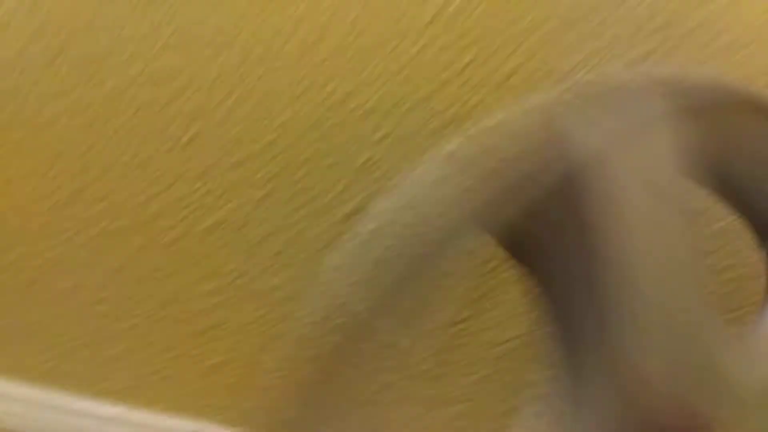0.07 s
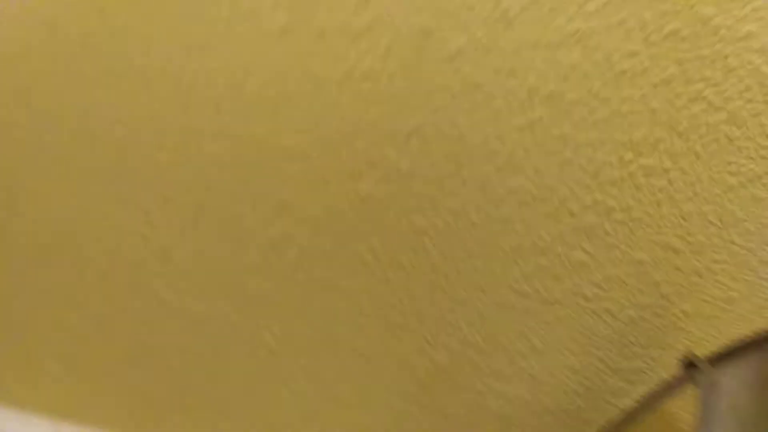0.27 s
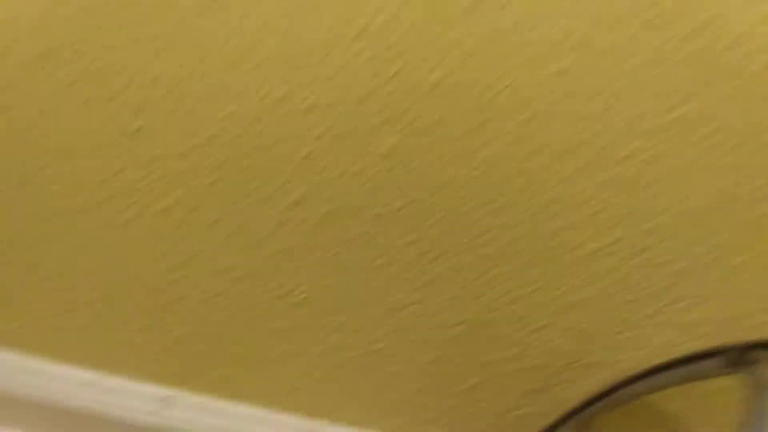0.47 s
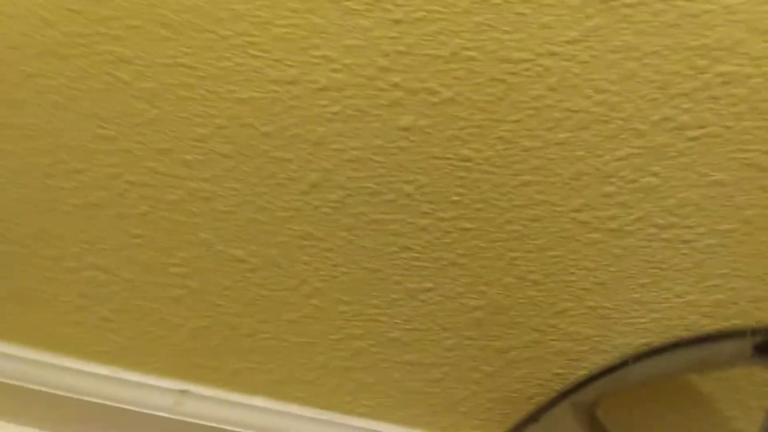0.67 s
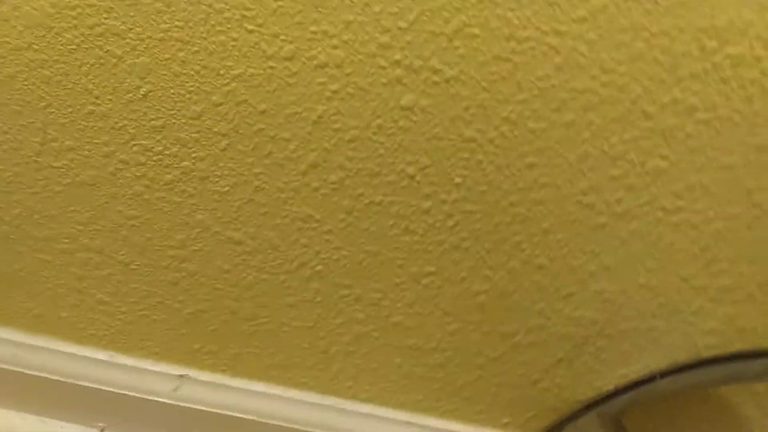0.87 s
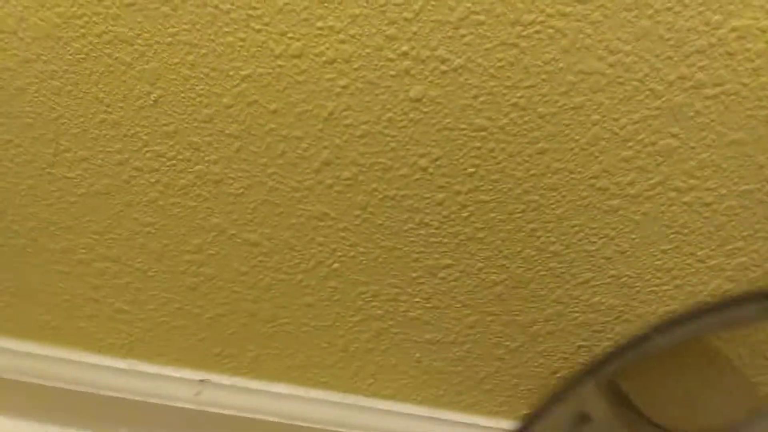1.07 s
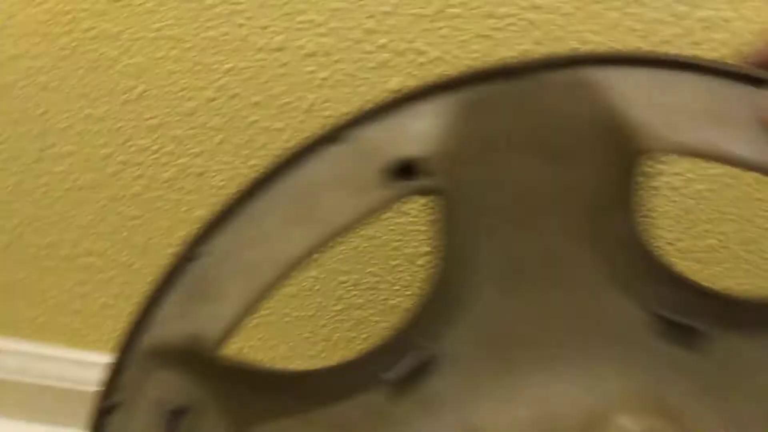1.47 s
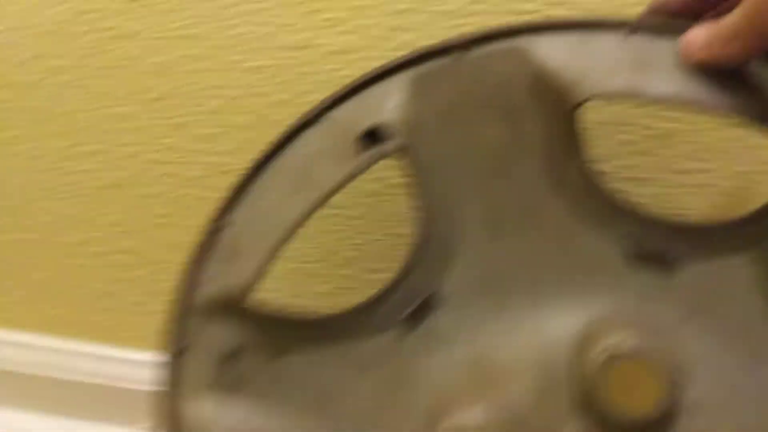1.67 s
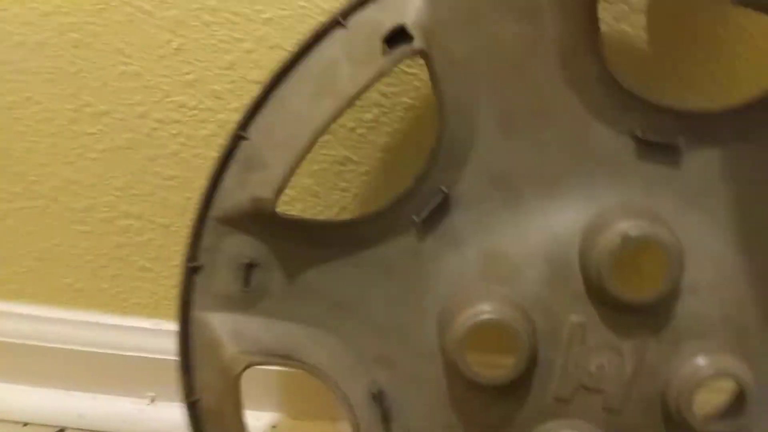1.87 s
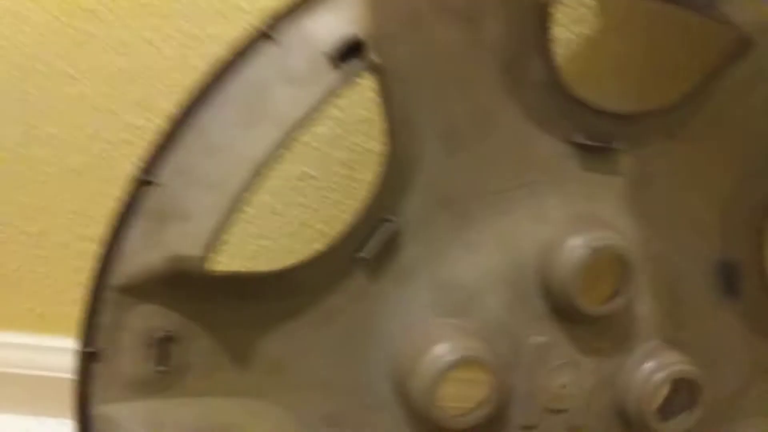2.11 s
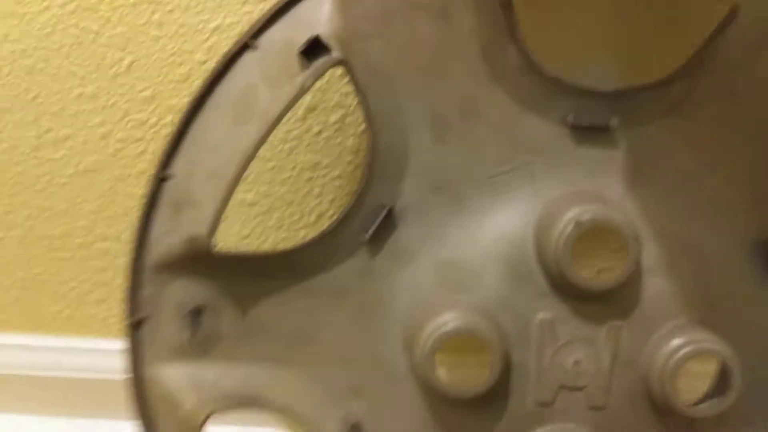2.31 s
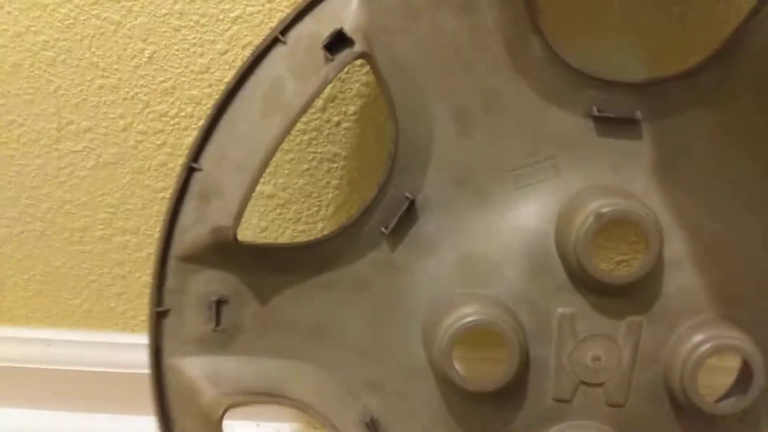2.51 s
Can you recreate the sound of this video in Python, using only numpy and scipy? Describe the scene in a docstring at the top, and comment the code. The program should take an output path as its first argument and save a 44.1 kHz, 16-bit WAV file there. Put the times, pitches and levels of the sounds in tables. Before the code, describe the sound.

Hands turn a plastic hubcap over, close by in a quiet room. A light knock and a loud one briefly ring the thin shell, followed by soft rubbing, dull bumps, a longer scrape and clusters of bright clicks.

```python
"""Light rubbing and two knocks on a plastic hubcap, handled close by in a small, quiet room.
It bumps dully as it is shifted, then scrapes, catches and clicks as it is turned over in the hands.
Knocks and clicks ring the thin shell, and soft bumps make it flex. Rubbing and scraping are many
tiny slips, while a sliding palm gives a smooth hush. The room adds a short tail of echo."""
import sys
import numpy as np
from scipy import signal
from scipy.fft import rfft, irfft, next_fast_len
from scipy.io import wavfile
from scipy.ndimage import uniform_filter1d

SR = 44100
rng = np.random.default_rng(int(sys.argv[2]) if len(sys.argv) > 2 else 0)


def wav_record(signal):
    """Record a signal, one row per channel, as 16-bit PCM in the file named by sys.argv[1]."""
    frames = np.transpose(np.atleast_2d(signal))
    bounded = np.clip(frames, -1, 1)
    # unit amplitude maps onto the largest positive 16-bit level
    quanta = np.round(bounded * 32767).astype(np.int16)
    wavfile.write(sys.argv[1], SR, quanta)


N = 116865
TIME = np.arange(N) / SR
AGE = TIME[:SR * 3 // 4]   # seconds since a contact

# The shell's own notes: (pitch [Hz], relative level [dB], fade time [s]). A fade is a 60 dB drop.
SHELL_NOTES = [(325.6, -5.5, 0.37), (384.7, -11.5, 0.87), (711, 1, .22), (878, 0.5, 0.41), (950, 13, 0.36),
               (1192, -17, 0.092), (1218, 11, 0.19), (1363, 10, 0.13), (1637, 2, 0.21), (1860, 0.5, 0.32),
               (2243, 15.5, 0.2), (2500, -41, 0.12), (2530, -8, 0.56), (5180, 10, 0.051)]
# How long the shell's blur of crowded notes lasts: (frequency [Hz], fade time [s])
SHELL_FADE = [(150, 0.11), (700, 0.3), (2000, 0.072), (5000, 0.11), (14000, 0.074)]
# How long the room's echo lasts: (frequency [Hz], fade time [s])
ROOM_FADE = [(150, 0.15), (700, 0.28), (2000, 0.21), (5000, 0.22), (14000, 0.17)]


def from_db(db):
    """Turn decibels into a multiplier."""
    return 10 ** (np.asarray(db) / 20)


def unit_power(x):
    """Scale a sound so that its average power is 1."""
    return x / np.sqrt(np.mean(x ** 2) + 1e-20)


def unit_energy(x):
    """Scale a sound so that its total energy is 1."""
    return x / np.sqrt(np.sum(x ** 2) + 1e-20)


def at_hz(points, hz):
    """Read between a table's rows, with frequency spaced in octaves."""
    frequencies, values = np.transpose(points)
    return np.interp(np.log(hz + 1), np.log(frequencies), values)


def colour(x, tone):
    """Make each frequency louder or softer, as the tone table says."""
    n = 2 * next_fast_len(len(x))
    gains = from_db(at_hz(tone, np.linspace(0, SR / 2, n // 2 + 1)))
    cepstrum = irfft(np.log(gains))
    cepstrum[1:n // 2] *= 2   # folded so the filter rings after a hit, never before
    cepstrum[n // 2 + 1:] = 0
    return irfft(rfft(x, n) * np.exp(rfft(cepstrum)))[:len(x)]


def keep_band(x, side, hz, order):
    """Keep the "low" or "high" side of hz; a higher order cuts more steeply."""
    return signal.sosfilt(signal.butter(order, hz, side, fs=SR, output="sos"), x)


def dying_noise(fade_times):
    """Countless overlapping notes blur into noise that dies away band by band."""
    edges = np.append(0, np.geomspace(250, SR / 2, 9))
    white = rfft(rng.standard_normal(len(AGE)))
    hz = np.fft.rfftfreq(len(AGE), 1 / SR)
    out = np.zeros(len(AGE))
    for low, high in zip(edges, edges[1:]):
        band = irfft(white * (hz >= low) * (hz < high), len(AGE))
        out += band * from_db(-60 * AGE / at_hz(fade_times, (low + high) / 2))
    return unit_energy(out)


def ringing(notes):
    """Clear fading notes, varied at random as if the shell were touched in a new spot."""
    out = np.zeros(len(AGE))
    for hz, db, fade_s in notes:
        sign = rng.choice([-1, 1])
        level = from_db(db + 2 * rng.normal() - 60 * AGE / fade_s)
        out += sign * level * np.cos(2 * np.pi * hz * AGE)
    return unit_energy(out)


def burst(fade_s):
    """The brief noise that starts a contact."""
    return unit_energy(rng.standard_normal(len(AGE)) * from_db(-60 * AGE / fade_s))


def strike(contacts, make_hit, order):
    """Play a fresh hit for each contact; each contact's brightness sets how much treble it keeps."""
    out = np.zeros(N + SR)
    for time_s, db, brightness_hz in contacts:
        hit = keep_band(make_hit(), "low", brightness_hz, order)
        opening_level = np.std(hit[:SR // 100])   # over the first 10 ms
        start = int(time_s * SR)
        out[start:start + len(hit)] += from_db(db) * hit / opening_level
    return out[:N]


def friction(slips_per_s, spread_db, hiss_db, ring_db, rough_db):
    """Tiny uneven slips over a hiss, bunched by the changing grip and smeared by the shell."""
    grip_s = .004   # the grip comes and goes this quickly
    sizes = from_db(spread_db * np.minimum(rng.exponential(1, N), 4)) * rng.choice([-1, 1], N)
    slips = unit_power(sizes * (rng.random(N) < slips_per_s / SR))
    slips += from_db(hiss_db) * rng.standard_normal(N)
    grip = np.interp(TIME / grip_s, np.arange(N), rng.standard_normal(N))
    slips *= from_db(rough_db * grip)
    return slips + from_db(ring_db) * signal.fftconvolve(slips, dying_noise(SHELL_FADE))[:N]


def loudness(curve, column):
    """Follow one decibel column of a table through time, silent outside its rows."""
    rows = np.array(curve)
    return from_db(np.interp(TIME, rows[:, 0], rows[:, column], left=-np.inf, right=-np.inf))


def slide(x, strokes, mids_db, treble_db, room_db):
    """The mids and treble of the friction rise and fall with each stroke, and the room echoes."""
    split_hz, ease_s = 3090, 0.0076
    out = np.zeros(N)
    for column, side, gain_db in ((1, "low", mids_db), (2, "high", treble_db)):
        band = unit_power(keep_band(x, side, split_hz, order=3))
        level = from_db(gain_db) * sum(loudness(curve, column) for curve in strokes)
        out += band * uniform_filter1d(level, int(ease_s * SR) + 1)
    return out + from_db(room_db) * signal.fftconvolve(out, dying_noise(ROOM_FADE))[:N]


def room_tone():
    """Quiet air with a faint hum and a thin, high whine."""
    # Tone of the air: (frequency [Hz], gain [dB])
    air_tone = [(30, -37), (60, -40), (140, -31), (300, -20), (500, -10.5), (720, -9.5), (950, -21),
                (1350, -7.5), (1700, -19), (6000, -18.5), (9000, -30), (16000, -36.5)]
    hum_hz, whine_hz = 728, 14002
    air = unit_power(colour(rng.standard_normal(N), air_tone))
    hum = unit_power(np.sin(2 * np.pi * hum_hz * TIME))
    whine = unit_power(np.sin(2 * np.pi * whine_hz * TIME))
    return from_db(-56) * air + from_db(-64) * hum + from_db(-79) * whine


def rubbing():
    """Hands and rim slide lightly over the plastic, faintly ringing the shell."""
    # One curve for each stroke: (time [s], relative mids level [dB], relative treble level [dB])
    strokes = [
        [(0.0, -50, -59), (0.034, -37.5, -48), (0.06, -40, -44), (0.08, -37, -53), (0.098, -42, -47.5),
         (0.16, -38.5, -34), (0.215, -49.5, -53.5)],
        [(0.5, -59, -36), (0.524, -40.5, -41), (0.556, -34, -29.5), (0.578, -35, -41.5), (0.582, -40.5, -36),
         (0.674, -55.5, -62), (0.69, -51, -64)],
        [(0.96, -64, -71), (0.972, -52, -54), (0.994, -58.5, -79), (1.024, -47, -50), (1.086, -48.5, -52),
         (1.13, -36.5, -40.5), (1.2, -52.5, -68)],
        [(1.224, -52, -40), (1.232, -41, -38.5), (1.248, -34, -37), (1.274, -42, -48.5), (1.284, -34, -35),
         (1.382, -49.5, -52), (1.41, -65, -53)],
        [(2.108, -32, -64), (2.126, -25, -23), (2.136, -33, -36), (2.196, -40, -42), (2.2, -42, -39)],
        [(2.292, -43, -49), (2.296, -64, -36.5), (2.344, -25, -39.5), (2.358, -42, -52), (2.374, -38, -59),
         (2.382, -28.5, -35), (2.48, -79, -83)],
        [(0.7, -46, -48), (0.75, -47.5, -53), (0.84, -51.5, -53.5), (0.9, -66, -67)],
    ]
    # Tone of a light rub: (frequency [Hz], gain [dB])
    rub_tone = [(60, -52), (190, -35.5), (420, -11), (700, -3), (1000, -4), (1500, -4.5), (2250, -2),
                (3300, -10), (4400, -7), (5700, -8.5), (8000, -18.5), (12700, -26), (16000, -32)]
    slips = friction(slips_per_s=1500, spread_db=5, hiss_db=-8.5, ring_db=-1, rough_db=0.6)
    ring = unit_power(signal.fftconvolve(slips, ringing(SHELL_NOTES))[:N])
    rub = unit_power(colour(slips, rub_tone)) + from_db(-15) * ring
    return slide(rub, strokes, mids_db=-0.5, treble_db=-1, room_db=-18.5)


def knocks():
    """Hard contacts crack, ring the shell and echo in the room."""
    # Each knock: (time [s], relative level [dB], brightness [Hz])
    contacts = [(.2265, -21.5, 2620), (.356, -34, 4150), (.3748, -7.5, 8650), (2.093, -28.5, 600),
                (2.339, -28, 1530), (2.383, -33, 2500)]
    # Tone of a knock: (frequency [Hz], gain [dB])
    knock_tone = [(35, -35), (90, -31), (230, -20), (340, -6.5), (500, -7.5), (620, -11.5), (800, -2.5),
                  (1300, -6.5), (1800, 1.5), (2200, -3.5), (2900, -6), (3500, -11.5), (5100, -10),
                  (8000, -21), (16000, -35)]

    def knock():
        noise = from_db(-6) * burst(fade_s=0.0093) + dying_noise(SHELL_FADE)
        echo = from_db(4) * dying_noise(ROOM_FADE)
        return unit_energy(colour(noise + echo, knock_tone)) + from_db(-2) * ringing(SHELL_NOTES)

    return strike(contacts, knock, order=1)


def bumps():
    """Soft, heavy pushes flex the whole shell with a dull thud."""
    # Each bump: (time [s], relative level [dB], brightness [Hz])
    contacts = [(.228, -33, 152), (.377, -40, 164), (.29, -32, 1460), (.588, -46, 197), (.702, -32, 590),
                (.745, -34, 740), (.766, -52, 400), (.815, -53, 400), (1.025, -54, 249),
                (1.078, -41.5, 590), (1.108, -36, 388), (1.122, -35.5, 600), (1.146, -35.5, 614),
                (1.235, -61, 900), (1.86, -55, 300), (2.096, -42.5, 254), (2.215, -54, 280),
                (2.338, -50.5, 600), (2.384, -55, 600)]
    # Tone of a bump: (frequency [Hz], gain [dB])
    bump_tone = [(30, -37), (80, -39), (125, -5.5), (300, 11.5), (700, -6.5), (2000, 10.5), (8000, 1.5)]
    # Low notes of the flexing shell: (pitch [Hz], relative level [dB], fade time [s])
    flex_notes = [(138.6, -1, 0.27), (170, 5, 0.15), (228, 2, 0.3), (245, -6, 0.29), (327.4, 0, 0.47),
                  (442, 0, 0.39), (610, 5, 0.23), (645, 10, 0.47)]

    def bump():
        noise = burst(fade_s=0.12) + from_db(-6.5) * dying_noise(ROOM_FADE)
        thud = unit_energy(colour(noise, bump_tone)) + from_db(-13.5) * ringing(flex_notes)
        return keep_band(thud, "high", hz=93, order=5)

    return strike(contacts, bump, order=2)


def clicks():
    """The rim catches and slips with bright snaps that ring the shell lightly."""
    # Each click: (time [s], relative level [dB], brightness [Hz])
    contacts = [(.433, -32, 6800), (.4905, -34.5, 13000), (.496, -39, 14000), (.512, -36.5, 11900),
                (.584, -35.5, 11800), (1.228, -40, 9000), (1.251, -54, 6480), (1.288, -31.5, 7300),
                (1.432, -41.5, 7900), (1.570, -36.5, 5000), (1.638, -25.5, 6000), (1.721, -23, 7000),
                (1.749, -23, 3560), (1.792, -37, 9350), (2.077, -39.5, 6300), (2.128, -23.5, 10900),
                (2.1355, -25.5, 5870), (2.139, -20.5, 5940), (2.143, -23, 8000), (2.206, -30, 8000),
                (2.2145, -23, 5400), (2.2175, -21.5, 9900), (2.221, -56, 6000), (2.297, -28.5, 6900),
                (2.304, -34.5, 7000), (2.323, -26.5, 4870), (2.333, -27.5, 5940), (2.380, -28, 6630),
                (2.5527, -45, 9200), (2.6066, -44, 9200), (2.6275, -53, 8000)]
    # Tone of a click: (frequency [Hz], gain [dB])
    click_tone = [(60, -44), (150, -49), (365, -29), (700, -18), (1100, -7), (1350, -12), (1650, -0.5),
                  (2050, 0), (2550, 2), (3400, -8.5), (4570, -2.5), (7000, -10), (16000, -16.5)]

    def click():
        noise = burst(fade_s=0.014) + from_db(-3.5) * dying_noise(SHELL_FADE)
        echo = from_db(-5) * dying_noise(ROOM_FADE)
        return unit_energy(colour(noise + echo, click_tone)) + from_db(-14) * ringing(SHELL_NOTES)

    return strike(contacts, click, order=2)


def scraping():
    """The rim drags harder as the hubcap turns, singing one note after another."""
    # The long scrape: (time [s], relative mids level [dB], relative treble level [dB])
    stroke = [(1.42, -73, -81), (1.432, -35.5, -52), (1.444, -36.5, -41), (1.538, -33, -37),
              (1.564, -41, -46), (1.572, -27, -33), (1.61, -35.5, -39), (1.64, -24.5, -28.5),
              (1.692, -30, -36), (1.702, -27, -29), (1.766, -28.5, -29), (1.814, -25.5, -24),
              (1.866, -30.5, -31.5), (1.91, -40.5, -69)]
    # Tone of the scrape: (frequency [Hz], gain [dB])
    scrape_tone = [(60, -69), (120, -68), (200, -34), (310, -13.5), (560, -10.5), (750, -6), (1050, -1.5),
                   (1500, -5.5), (2300, -4), (3400, -13.5), (4470, -10.5), (5080, -19.5), (5700, -13),
                   (6600, -17), (11200, -27.5), (16000, -37.5)]
    # Notes that swell and fade as the contact point travels:
    # (pitch [Hz], relative level [dB], fade time [s], peak time [s], swell half-width [s])
    singing_notes = [(717, -12, 0.097, 1.7, 0.6), (1022, 4, 0.11, 1.752, 0.033),
                     (1150, -1, 0.02, 1.72, 0.051), (2000, -7, 0.082, 1.80, 0.035),
                     (2290, -7.5, 0.016, 1.617, 0.072), (4620, -1.5, 0.0071, 1.433, 0.065),
                     (5340, -6, 0.016, 1.4, .05), (5750, -9, 0.023, 1.726, 0.12)]
    slips = friction(slips_per_s=1000, spread_db=2, hiss_db=-11, ring_db=-6.5, rough_db=2)
    scrape = unit_power(colour(slips, scrape_tone))
    for hz, db, fade_s, peak_s, width_s in singing_notes:
        swell = np.exp(-.5 * ((TIME - peak_s) / width_s) ** 2)
        drag = colour(rng.standard_normal(N), scrape_tone)
        note = signal.fftconvolve(drag, ringing([(hz, 0, fade_s)]))[:N]
        scrape += from_db(db) * swell * unit_power(note)
    return slide(scrape, [stroke], mids_db=-3, treble_db=-1.5, room_db=-9)


def palm():
    """A palm slides over the smooth plastic face with a hollow, even hush."""
    # The palm's stroke: (time [s], level [dB])
    stroke = [(1.88, -61), (1.93, -47), (1.98, -43.5), (2.03, -48), (2.08, -48)]
    # Tone of skin on plastic: (frequency [Hz], gain [dB])
    palm_tone = [(100, -50), (400, -7), (700, -11.5), (950, -4), (1250, 2), (1550, -1), (1950, -8.5),
                 (2350, -5), (2900, -18.5), (5500, -16.5), (16000, -51)]
    hush = unit_power(colour(rng.standard_normal(N), palm_tone))
    return loudness(stroke, column=1) * hush


def scene():
    """All the hits and slides over the quiet room, in one channel."""
    hits = from_db(-6) * knocks() + from_db(-3) * clicks() + from_db(-5) * bumps()
    return (hits + rubbing() + scraping() + palm() + room_tone())[None]


def record(dry):
    """Round off the loudest peaks and steeply cut the highest treble."""
    cutoff_hz = 15950
    treble_cut = signal.ellip(12, .1, 80, cutoff_hz, fs=SR, output="sos")
    return signal.sosfilt(treble_cut, np.tanh(dry))


dry = scene()
out = record(dry)
wav_record(out)
```